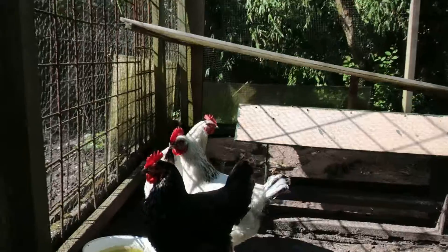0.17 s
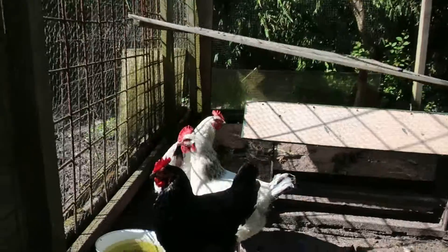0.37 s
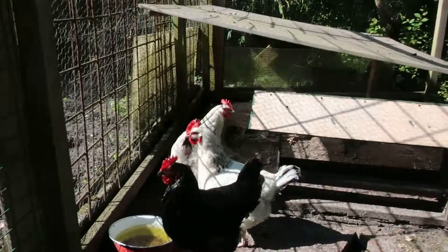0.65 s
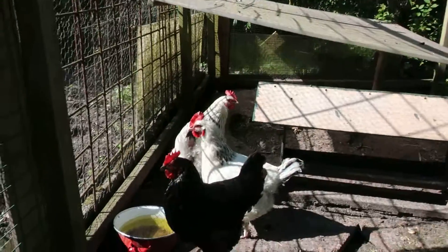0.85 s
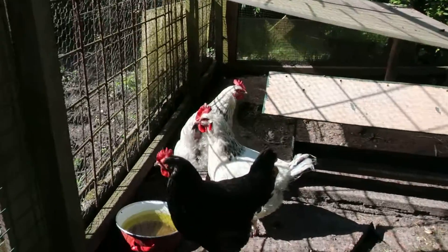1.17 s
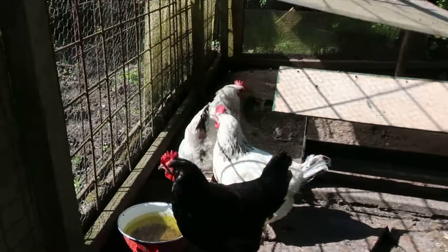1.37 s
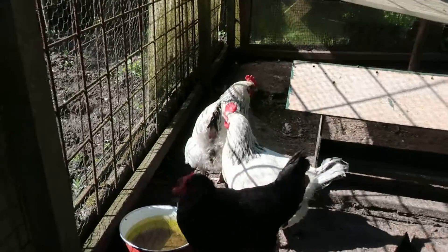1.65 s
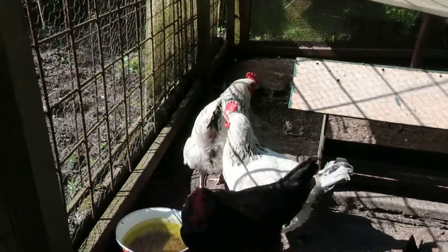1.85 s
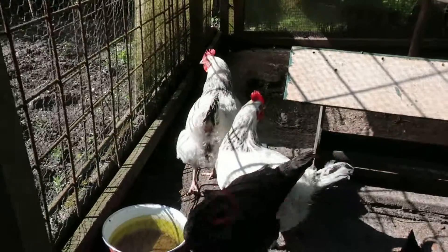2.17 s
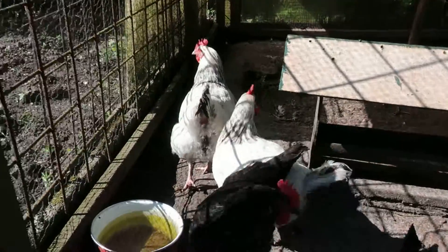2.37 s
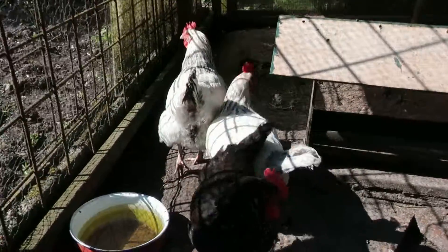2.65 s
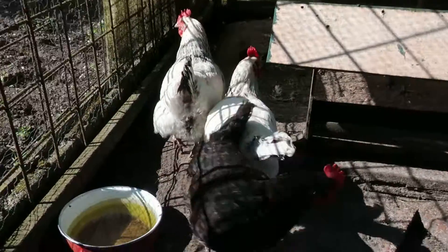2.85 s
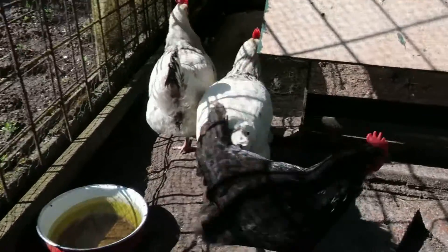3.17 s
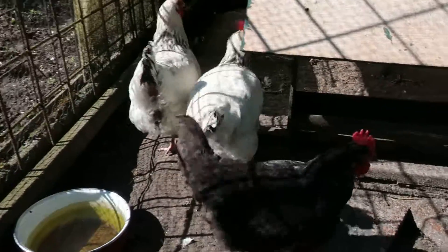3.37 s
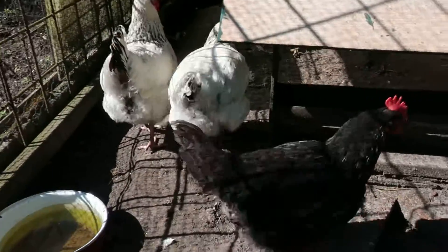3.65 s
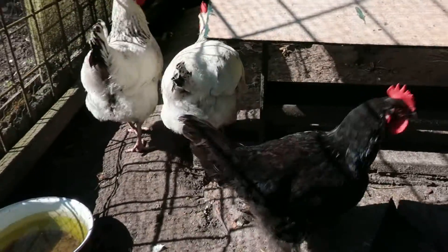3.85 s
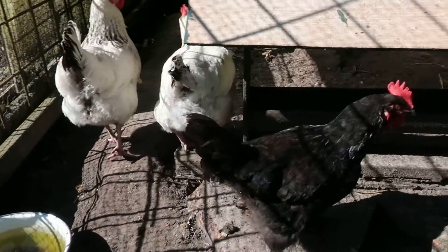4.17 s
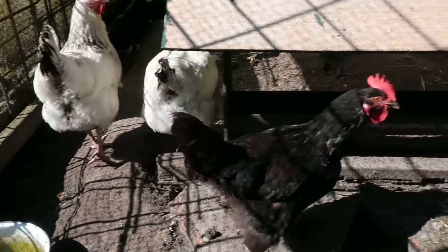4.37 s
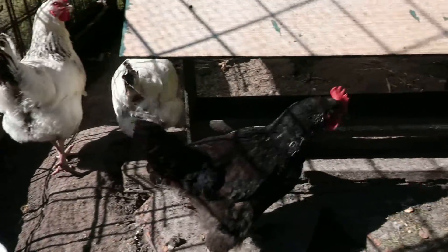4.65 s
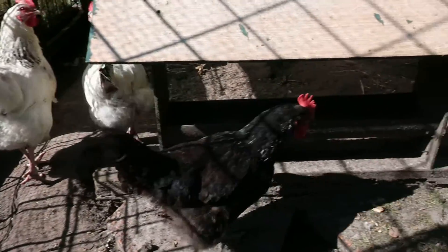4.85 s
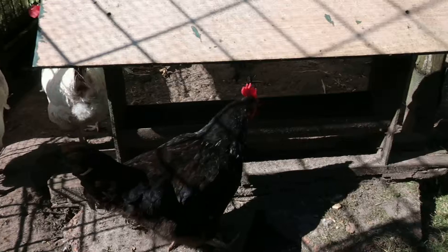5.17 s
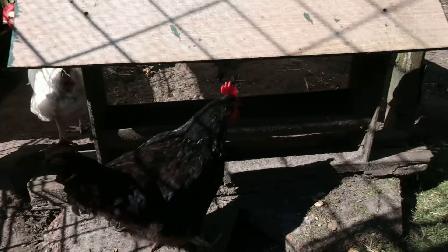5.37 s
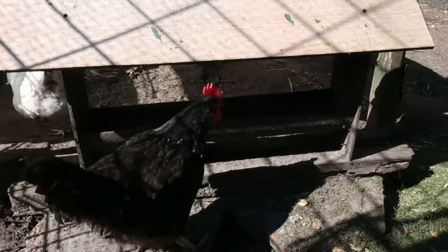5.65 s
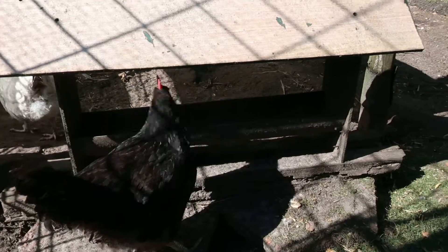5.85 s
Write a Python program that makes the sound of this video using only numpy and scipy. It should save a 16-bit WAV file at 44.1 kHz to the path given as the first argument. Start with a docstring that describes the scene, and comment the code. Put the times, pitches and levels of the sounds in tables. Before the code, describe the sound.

An outdoor hen run, close stereo microphone, with low wind and far traffic rumbling softly throughout. The first 0.9 seconds are nearly empty, just faint taps. From 0.9 to 1.7 s a soft, steady whine around 600 Hz mixes with short low clucks and small taps. A gust bumps near 2.35 s. At 2.5-2.8 s firmer clucks bunch together, then a sharp woody tap at 2.84 s as a clearer whine holds to 3.1 s, breaking into quick flutters and clucks until 3.4 s. Last clucks at 3.6 s, with a dull foot drag at 3.7 s. Songbirds, trilling from about 2.8 s, stand out at 3.5-4.6 s with echoing whistles. A whine rises and falls at 4.8-5.2 s; another quavers rapidly from 5.2 s, growing brighter and loudest at 5.64 s. A brief whine follows at 5.9 s with faint birds.

```python
"""Hens in a wire run: drawn-out whines, nearly pure tones whose pitch flips and flutters, overtones shaped by the beak.
Between them short clucks, harmonic voices through throat and mouth resonances; damped rings for beak and claw taps.
Feet scuff the dirt in bursts of gritty noise. Songbirds whistle and trill from the trees beyond, with echoes.
Far traffic and a light wind rumble as banded noise under a close pair of microphone ports.
Faint hums at fixed pitch swell and fade."""
import sys
import numpy as np
from scipy import signal
from scipy.io import wavfile
from scipy.ndimage import map_coordinates

SR = 44100
rng = np.random.default_rng(int(sys.argv[2]) if len(sys.argv) > 2 else 0)


def wav_record(signal):
    """Record a signal, one row per channel, as 16-bit PCM in the file named by sys.argv[1]."""
    frames = np.transpose(np.atleast_2d(signal))
    bounded = np.clip(frames, -1, 1)
    # unit amplitude maps onto the largest positive 16-bit level
    quanta = np.round(bounded * 32767).astype(np.int16)
    wavfile.write(sys.argv[1], SR, quanta)


N = 265041
TIME_S = np.arange(N) / SR

# far traffic and leaves, spectrum: hz, density_db_per_hz
AIR_SPECTRUM = [(18, -15.5), (40, 0), (100, 1), (200, -9), (400, -16), (800, -17.5), (1600, -24.5),
                (3200, -32.5), (6300, -40), (8500, -42.5), (10500, -49.5), (13500, -47.5), (15500, -56)]
AIR_DB = -39
# wind on the ports: time_s, level_db
WIND_GUSTS = [(0.0, -39), (.15, -46), (.32, -33), (.4, -40.5), (1.04, -44.5), (1.28, -41), (2.33, -43),
              (2.35, -29), (2.4, -33), (2.61, -43.5), (3.67, -38.5), (3.92, -44.5), (4.35, -40),
              (4.45, -47), (4.54, -35.5), (5.04, -44.5), (5.36, -44.5), (5.47, -39), (6.01, -43)]
# faint hums at fixed pitch, swelling and fading: pitch_hz, waver_points_per_s, level_db
HUM_TONES = [(98.4, 5.4, -52), (133, 5, -49.5), (790, 29, -59.5), (6680, 8, -82)]
# left-right likeness; the ports turn the treble out of step: hz, likeness (-1 to 1)
EAR_LIKENESS = [(60, 1), (150, 1), (380, .66), (940, 0.69), (2360, 0.2), (5920, -0.56), (9000, -0.71),
                (14800, -0.95)]

# songbird whistles: start_s, end_s, first_hz, last_hz, level_db
BIRD_WHISTLES = [(0, .056, 1835, 1794, -54), (1.52, 1.599, 1482, 1707, -53), (1.86, 1.93, 1420, 1620, -54),
                 (1.943, 2.035, 1620, 1740, -55), (2.04, 2.17, 1798, 1784, -57),
                 (1.84, 1.948, 1850, 1897, -62.5), (1.9, 2.015, 2510, 2490, -61),
                 (2.202, 2.292, 1880, 1996, -61.5), (2.12, 2.24, 1200, 1077, -55),
                 (3.49, 3.578, 3063, 2965, -45), (3.555, 3.599, 3000, 2822, -40.5),
                 (3.59, 3.608, 2865, 2670, -47), (3.534, 3.66, 1980, 1910, -52),
                 (3.93, 3.975, 1290, 1520, -50), (3.964, 4.02, 1488, 1850, -49),
                 (4.111, 4.186, 2035, 2480, -40), (4.17, 4.24, 1820, 1765, -51),
                 (4.21, 4.375, 1779, 1640, -45.5), (4.228, 4.308, 3530, 3350, -63),
                 (4.31, 4.361, 2137, 2480, -39.5), (4.35, 4.41, 3360, 3300, -67),
                 (4.425, 4.445, 2900, 2880, -58), (4.425, 4.456, 4050, 4220, -65),
                 (4.45, 4.469, 4220, 3750, -59.5), (4.465, 4.482, 3840, 3950, -62.5),
                 (4.475, 4.487, 3950, 2800, -53), (4.535, 4.56, 4200, 4350, -66.5),
                 (4.557, 4.576, 4050, 3750, -60), (4.573, 4.59, 3830, 3900, -62),
                 (4.585, 4.598, 3910, 2800, -54), (4.892, 4.995, 2702, 2654, -53),
                 (5.02, 5.3, 2750, 2484, -66.5), (5.868, 5.95, 1620, 1720, -56),
                 (5.945, 5.998, 1750, 1715, -49.5), (5.94, 6.01, 1190, 1140, -56.5)]
# songbird trills: start_s, end_s, first_hz, last_hz, level_db, trill_depth_hz
BIRD_TRILLS = [(2.812, 3.287, 2202, 2250, -47.5, 289), (3.166, 3.275, 3350, 3400, -60, 80),
               (3.455, 3.52, 3084, 3060, -54, 90), (3.854, 3.975, 2402, 1900, -50.5, 60),
               (3.96, 4.086, 1858, 1952, -45, 80), (4.18, 4.32, 2280, 2127, -45.5, 280),
               (4.34, 4.593, 2680, 2610, -52, 45), (4.37, 4.519, 2280, 2400, -56.5, 150),
               (4.451, 4.629, 1700, 1882, -54.5, 80), (4.8, 5.096, 1865, 1674, -57, 150),
               (5.7, 5.849, 1900, 2320, -58.5, 120), (5.78, 5.869, 1500, 1610, -49.5, 130)]
TRILL_PER_S, TRILL_RETURN = 33.7, .36  # return: share of each cycle spent climbing
TRILL_WIDENS, TRILL_PULSE, TRILL_BURR = .45, .35, .16  # shares: depth gained, level pulse, pitch burr
LINGER = .64  # halfway through, a glide stands this share of its range above its low end
SONG_FLUTTER, SONG_WAVER_HZ = .25, 18  # flutter: share of level
TREES_T60_S, TREES_DB, TREES_WIDTH = .4, -5.5, .45
WALL_DELAY_S, WALL_T60_S, WALL_DB = .09, .25, -12  # a far wall throws the song back late

# feet scuffing the dirt: start_s, length_s, level_db
FOOT_SCUFFS = [(1.38, .12, -65), (2.294, .028, -71), (2.54, .017, -41.5), (2.61, .058, -65.5),
               (2.7656, 0.016, -45.5), (2.878, 0.057, -51), (3.026, .034, -55.5), (3.362, .015, -50),
               (3.5514, .021, -55.5), (3.74, .043, -56), (3.898, .026, -46), (3.955, .056, -48.5),
               (4.805, .032, -58), (4.97, 0.043, -63), (5.113, .017, -62)]
# one heavy dull drag: start_s, length_s, level_db, brightness_db
HEAVY_DRAG = (3.683, 0.0667, -39.5, -21)
# scuff spectrum: hz, density_db_per_hz
DIRT_SPECTRUM = [(200, -3.5), (1500, 2.5), (3000, -0.5), (5000, -13.5), (8000, -27), (13000, -19.5)]
FIRM_SCUFF_DB, FIRM_BRIGHT_DB, BRIGHT_DB_PER_DB_LIGHTER = -45, 3.5, .62

# beak and claw taps, and one click at the start of a cluck (3.114 s): time_s, peak_db (before the contact
# filter), ring_hz
BEAK_CLAW_TAPS = [(0.0592, -39, 1760), (.4777, -42, 1770), (1.3373, -36, 1420), (1.7348, -32, 1990),
                  (1.789, -45, 2680), (2.7683, -29, 1210), (2.8436, -12, 1826), (3.114, -40, 2650)]
TAP_CONTACT_HZ, TAP_T60_S, FAINT_RING_S_PER_DB = 3000, .0062, .0005  # fainter taps ring longer

# clucks: start_s, end_s, first_hz, last_hz, level_db, throat_hz, roughness (0-1), growl (0-1)
HEN_CLUCKS = [(0.885, 0.945, 349.6, 314.6, -32, 643, 0.05, 0),
              (1.209, 1.271, 354.3, 375, -25, 765, 0.02, 0.2),
              (1.272, 1.351, 359, 346.3, -26.5, 707, 0.08, 0.07),
              (1.376, 1.463, 353, 356, -32.5, 650, 0.14, 0.18),
              (1.501, 1.563, 341, 355, -41, 710, 0.09, .05), (1.542, 1.613, 281.4, 269, -40, 590, 0.19, 0),
              (1.599, 1.632, 417, 426, -35, 606, 0.23, 0.1),
              (1.605, 1.714, 287.2, 269.6, -45.5, 300, 0.01, .05),
              (1.628, 1.678, 272, 277, -32.5, 543, 0.19, 0.2),
              (1.66, 1.705, 389, 394, -24, 805, 0.02, 0.03), (1.698, 1.74, 389, 368, -43, 780, 0.29, 0),
              (2.078, 2.131, 500, 517, -30, 500, 0.08, 0.53),
              (2.091, 2.131, 445, 448, -31.5, 936, 0.16, 0.78),
              (2.477, 2.507, 275, 330, -30.5, 707, 0.22, 0.03),
              (2.494, 2.522, 385.4, 383, -20.5, 820, 0.13, 0.01),
              (2.515, 2.553, 330, 315, -39.5, 704, 0.2, 0), (2.649, 2.692, 394, 398, -17, 790, 0.05, 0),
              (2.682, 2.735, 261.6, 265.4, -30, 746, 0.3, 0.3),
              (2.722, 2.755, 398, 403.4, -18, 790, 0.06, 0.2),
              (2.679, 2.865, 275.8, 278, -46.5, 282, 0, 0.1),
              (2.748, 2.813, 415, 389.5, -26, 775, 0.15, 0.4),
              (3.106, 3.144, 335.5, 338, -27, 754, 0.18, 0),
              (3.15, 3.226, 335.2, 358.6, -29.5, 788, 0.11, 0.33),
              (3.264, 3.328, 345, 352, -29, 777, 0.11, 0.14), (3.599, 3.638, 302, 304, -33.5, 830, .15, 0),
              (3.628, 3.689, 348, 338, -30.5, 800, 0.19, 0.05)]
THROAT_WIDTH_HZ, CHEST_DB, GROWL_HZ = 227, -21, 75.7
# mouth resonance at full cry: hz, gain_db
MOUTH_GAIN = [(1000, -37.5), (1500, -30.5), (2100, -55), (3000, -69)]
FULL_CRY_DB, MOUTH_DB_PER_DB = -14.5, .54  # a softer cluck opens the mouth less
# beak wide open, resonance: hz, gain_db
RASP_GAIN = [(2300, -27.5), (2800, 1), (3300, -7), (4000, -9.5), (4600, -21.5)]
# beak wide open, times: start_s, end_s, gain_db
RASP_TIMES = [(2.73, 2.752, -37.5), (2.78, 2.805, -33.5)]

# drawn-out whines, one list of points a call: time_s, pitch_hz, level_db
HEN_WHINES = [
    [(.94, 618, -44), (.99, 592, -43.5), (1.08, 610, -33.5), (1.2, 620, -32.5), (1.3, 620, -33),
     (1.37, 650, -29), (1.465, 597.5, -30), (1.478, 593, -43.5), (1.49, 605, -32.5), (1.52, 540, -47)],
    [(2.695, 790, -43.5), (2.735, 734.7, -26.5), (2.79, 717.5, -21.5), (2.86, 750, -24), (2.95, 720, -21.5),
     (2.985, 734, -23.5), (3.0, 754, -34.5), (3.08, 790, -35), (3.105, 846, -40)],
    [(3.12, 953, -33.5), (3.146, 792, -29.5), (3.165, 810, -36), (3.178, 881, -34.5), (3.206, 840, -27.5),
     (3.229, 964, -37.5), (3.243, 864, -27.5), (3.258, 868, -28), (3.27, 890, -38), (3.284, 869, -28),
     (3.304, 836, -29.5), (3.324, 918, -36), (3.333, 948, -41.5), (3.36, 865, -46)],
    [(3.32, 1280, -50), (3.328, 1300, -44), (3.337, 1350, -61), (3.348, 1365, -37.5), (3.36, 1330, -55)],
    [(4.812, 608, -41.5), (4.85, 629, -31.5), (4.93, 735, -23), (4.99, 822, -21), (5.045, 788, -21.5),
     (5.08, 651, -31), (5.13, 632, -32.5), (5.165, 562, -36), (5.18, 570, -47)],
    [(5.182, 590, -34.5), (5.19, 671, -29.5), (5.27, 664.5, -28), (5.41, 726, -21.5), (5.45, 731, -21),
     (5.505, 704, -25), (5.542, 621, -26.5), (5.565, 680, -23.5), (5.59, 752, -19.5), (5.636, 775, -15.5),
     (5.652, 750, -32)],
    [(5.865, 708, -50), (5.871, 723, -29), (5.89, 651, -30), (5.93, 691, -28), (5.942, 680, -41)],
]
# voice flips, runs of them make a flutter: time_s, jump_hz, swell_db (negative dips)
VOICE_FLIPS = [(2.875, 80, -14), (3.005, 119, -4.5), (3.03, -0.5, 9.5), (3.05, 60, -7), (3.066, 142, 0),
               (4.858, 130, 4.5), (4.888, 249.5, 2), (4.919, 289, -5.5), (5.014, 80, -5.5),
               (5.216, 50, 2.5), (5.242, 90, 5.5), (5.272, 110, 6), (5.302, 215, 5), (5.33, 275, 4),
               (5.363, 284.5, 3), (5.39, 290, 2), (5.424, 200.5, -2), (5.455, 40, 1), (5.484, 50, 2.5),
               (5.512, 45, 4), (5.535, 39.5, 2.5), (5.56, 44.5, 2.5), (5.59, 45, 2), (5.908, 162, -2.5)]
# stretches where the whine rattles: start_s, end_s, pitch_shake_hz, level_shake_db
WHINE_RATTLES = [(1.2, 1.5, 18, 2), (2.69, 2.8, 12, 2), (3.04, 3.11, 25, 2), (3.12, 3.23, 30, 4),
                 (3.27, 3.36, 35, 4), (4.86, 4.93, 25, 2), (5.29, 5.435, 20, 1.2)]
# throat resonance a flip sweeps the tone across: hz, gain_db
WHINE_THROAT_GAIN = [(600, -7), (720, -3), (820, 0.5), (900, -0.5), (1000, -5.5)]
# whine overtones leaving by the open beak: hz, gain_db
BEAK_GAIN = [(1100, -11.5), (1320, -3), (1540, 0.5), (1620, -8.5), (1700, -25.5), (2000, -28), (2300, -29),
             (3000, -30), (3600, -20), (4000, -33.5), (4800, -45.5)]
# overtone level at the start of each whine and after .22 s: first_overtones_db, later_overtones_db
OVERTONE_LEVELS = [(-37, -38), (-32.5, -36.5), (-25, -27), (-40, -40), (-36, -26.5), (-26.5, -11),
                   (-15.5, -9)]
OVERTONE_SHIFT_S, FLIP_S = .22, .023
WHINE_WAVER_HZ, WHINE_WAVER_DB = 12, .7
FLIP_MUFFLES_DB_PER_HZ = -.0502  # overtones drop while the pitch is raised

HENS_LEFT_OVER_RIGHT_DB, HENS_LEFT_LEAD_S = -1.1, 1.2e-5
COOP_DB, COOP_T60_S, COOP_WIDTH = -21, .07, .25
CUTOFF_HZ = 16000


def from_db(db):
    """Amplitude gain of a level."""
    return 10 ** (np.asarray(db) / 20)


def rms_one(x):
    """Scale to unit power."""
    return x / np.sqrt(np.mean(x ** 2) + 1e-20)


def at_hz(points, hz):
    """Read a curve on a log frequency axis."""
    curve_hz, values = np.array(points).T
    return np.interp(np.log(hz), np.log(curve_hz), values)


def drift(points_per_s):
    """Random points joined smoothly, rms 1; at most 400 a second."""
    points = rng.standard_normal(2500)
    return rms_one(map_coordinates(points, [TIME_S * min(points_per_s, 400) + 2], order=3))


def note(start_s, end_s, attack_s, release_s):
    """Samples of a note, progress 0-1 through it, and its rounded envelope."""
    span = slice(int(start_s * SR), int(end_s * SR))
    t = TIME_S[span]
    edge = np.clip(np.minimum((t - start_s) / attack_s, (end_s - t) / release_s), 0, 1)
    return span, (t - start_s) / (end_s - start_s), np.sin(np.pi / 2 * edge) ** 2


def stereo_noise(spectrum, patchy_db, near):
    """0.4-octave noise bands, each with its own level, flicker and likeness (raised by near); rms 1."""
    out, edges_hz = 0, 18 * 2 ** np.arange(0, 10, .4)
    white = rng.standard_normal((2, 2, N))
    for k, (low_hz, high_hz) in enumerate(zip(edges_hz, edges_hz[1:])):
        band = signal.butter(2, [low_hz, high_hz], "band", fs=SR, output="sos")
        mid, side = signal.sosfilt(band, white[k % 2])
        hz = np.sqrt(low_hz * high_hz)
        alike = np.clip(at_hz(EAR_LIKENESS, hz) + near, -.99, .993)
        gain = from_db(at_hz(spectrum, hz) + patchy_db * drift(6))
        out = out + gain * (np.sqrt(1 + alike) * mid + np.sqrt(1 - alike) * side * [[1], [-1]])
    return rms_one(out)


def echoes(x, t60_s, width):
    """Scattered returns dying away; width scales the part opposite in the two ears."""
    t = TIME_S[:int(.8 * SR)]
    decay = from_db(-60 * t / t60_s) * (t > .004)
    mid, side = rng.standard_normal((2, len(t))) * decay
    tail = (mid + width * side * [[1], [-1]]) / np.sqrt(np.sum(mid ** 2))
    return signal.fftconvolve(x[None], tail, axes=1)[:, :N]


def background():
    """Broad hiss, a rumble that follows the gusts, and hums that swell and fade."""
    air = stereo_noise(AIR_SPECTRUM, patchy_db=1.1, near=0)
    low = signal.sosfilt(signal.butter(2, 230, fs=SR, output="sos"), air)
    gust_db = np.interp(TIME_S, *np.transpose(WIND_GUSTS))
    out = from_db(AIR_DB) * (air - low) + from_db(gust_db) * rms_one(low)
    for hz, waver_points_per_s, level_db in HUM_TONES:
        tone = np.sin(2 * np.pi * hz * TIME_S)
        out = out + from_db(level_db) * drift(waver_points_per_s) * tone
    return out


def songbirds():
    """Whistled glides, curved in pitch; a trill swings the pitch quickly and pulses twice a cycle."""
    out, unsteady_turns, burr = np.zeros(N), .08 * drift(50), drift(300)
    flutter, waver_hz = 1 + SONG_FLUTTER * drift(240), SONG_WAVER_HZ * drift(150)
    rows = [(*row, 0) for row in BIRD_WHISTLES] + BIRD_TRILLS
    for start_s, end_s, first_hz, last_hz, level_db, trill_hz in rows:
        length_s = end_s - start_s
        span, along, envelope = note(start_s, end_s, min(.3 * length_s, .05), .15 * length_s)
        turns = TRILL_PER_S * (TIME_S[span] - start_s) + unsteady_turns[span]
        swing = signal.sawtooth(2 * np.pi * turns, TRILL_RETURN)
        swing = swing * (1 + TRILL_WIDENS * (along - .5)) + TRILL_BURR * burr[span]
        pulse = 1 - TRILL_PULSE * (trill_hz > 0) * np.cos(4 * np.pi * turns)
        middle_hz = min(first_hz, last_hz) + LINGER * abs(last_hz - first_hz)
        bend_hz = 2 * middle_hz - (first_hz + last_hz) / 2  # curve passes through middle_hz
        glide_hz = first_hz * (1 - along) ** 2 + 2 * bend_hz * along * (1 - along) + last_hz * along ** 2
        hz = glide_hz + trill_hz * swing + waver_hz[span]
        tone = np.sin(2 * np.pi * np.cumsum(hz) / SR)
        out[span] += np.sqrt(2) * from_db(level_db) * envelope * pulse * tone
    return out * flutter


def scuffs():
    """Gritty noise bursts; brightness sets the part above 4500 Hz, more for lighter scuffs."""
    grit = stereo_noise(DIRT_SPECTRUM, patchy_db=1, near=.7) * from_db(2.5 * drift(400))
    treble = signal.sosfilt(signal.butter(2, 4500, "high", fs=SR, output="sos"), grit)
    out, rows = np.zeros((2, N)), []
    for start_s, length_s, level_db in FOOT_SCUFFS:
        bright_db = FIRM_BRIGHT_DB + BRIGHT_DB_PER_DB_LIGHTER * (FIRM_SCUFF_DB - level_db)
        rows.append((start_s, length_s, level_db, bright_db))
    for start_s, length_s, level_db, bright_db in rows + [HEAVY_DRAG]:
        span, _, envelope = note(start_s, start_s + length_s, .35 * length_s, .5 * length_s)
        burst = grit[:, span] + (from_db(bright_db) - 1) * treble[:, span]
        out[:, span] += from_db(level_db) * envelope * burst
    return out


def taps():
    """Short damped rings, low-passed by a soft contact."""
    out = np.zeros(N)
    loudest_db = max(db for _, db, _ in BEAK_CLAW_TAPS)
    for start_s, peak_db, ring_hz in BEAK_CLAW_TAPS:
        t60_s = TAP_T60_S + FAINT_RING_S_PER_DB * (loudest_db - peak_db)
        t = np.clip(TIME_S - start_s, 0, None)
        out -= from_db(peak_db - 60 * t / t60_s) * np.sin(2 * np.pi * ring_hz * t)
    return signal.sosfilt(signal.butter(7, TAP_CONTACT_HZ, fs=SR, output="sos"), out)


def clucks():
    """Harmonics through a narrow throat and a broad mouth resonance; growl chops them into throbs."""
    out, waver, breath = np.zeros(N), drift(150), drift(300)
    gape = np.zeros(N)
    for start_s, end_s, rasp_db in RASP_TIMES:
        span, _, envelope = note(start_s, end_s, .0089, .008)
        gape[span] = from_db(rasp_db) * envelope
    for start_s, end_s, first_hz, last_hz, level_db, throat_hz, rough, growl in HEN_CLUCKS:
        span, along, envelope = note(start_s, end_s, .0064, .012)
        hz = (first_hz + (last_hz - first_hz) * along) * (1 + .26 * rough * waver[span])
        phase, voice = 2 * np.pi * np.cumsum(hz) / SR, 0
        mouth_db = MOUTH_DB_PER_DB * (level_db - FULL_CRY_DB)
        for k in range(1, 12):
            throat = 1 / (1 + ((k * hz - throat_hz) / THROAT_WIDTH_HZ) ** 2) ** 1.8
            mouth = from_db(at_hz(MOUTH_GAIN, k * hz) + mouth_db)
            rasp = gape[span] * from_db(at_hz(RASP_GAIN, k * hz))
            chest = from_db(CHEST_DB) * (k == 1)
            voice = voice + (throat + mouth + rasp + chest) * np.cos(k * phase + k)
        throb_s = TIME_S[span] - start_s - .019
        throb = 1 + np.clip(growl, 0, 1) * np.cos(2 * np.pi * GROWL_HZ * throb_s)
        out[span] += from_db(level_db) * envelope * throb * (1 + rough * breath[span]) * rms_one(voice)
    return out


def whines():
    """A nearly pure tone; flips jump its pitch and change its level, overtones pass the beak."""
    rise_hz, swell_db = WHINE_WAVER_HZ * drift(70), WHINE_WAVER_DB * drift(90)
    pitch_shake, level_shake = drift(260), drift(260)
    for start_s, end_s, shake_hz, shake_db in WHINE_RATTLES:
        span, _, envelope = note(start_s, end_s, .01, .01)
        rise_hz[span] += shake_hz * envelope * pitch_shake[span]
        swell_db[span] += shake_db * envelope * level_shake[span]
    for flip_s, jump_hz, gain_db in VOICE_FLIPS:
        bump = np.cos(np.pi * np.clip((TIME_S - flip_s) / FLIP_S, -.5, .5)) ** 1.4
        rise_hz, swell_db = rise_hz + jump_hz * bump, swell_db + gain_db * bump
    # phase blur in radians: each overtone is hoarser than the one below
    blur = {k: (.25 + .28 * (k - 2)) * drift(250) for k in range(2, 7)}
    out = np.zeros(N)
    for call, overtone_points_db in zip(HEN_WHINES, OVERTONE_LEVELS):
        s, pitch_hz, level_db = np.transpose(call)
        span, _, envelope = note(s[0], s[-1], .0019, .0029)
        t = TIME_S[span]
        held_hz = np.interp(t, s, pitch_hz)
        hz = held_hz + rise_hz[span]
        phase = 2 * np.pi * np.cumsum(hz) / SR
        throat_db = at_hz(WHINE_THROAT_GAIN, hz) - at_hz(WHINE_THROAT_GAIN, held_hz)
        fundamental = from_db(throat_db) * np.cos(phase)
        overtones = 0
        for k in range(2, 7):
            overtones = overtones + from_db(at_hz(BEAK_GAIN, k * hz)) * np.cos(k * phase + blur[k][span])
        overtone_db = np.interp(t - s[0], [0, OVERTONE_SHIFT_S], overtone_points_db)
        overtone_db = overtone_db + FLIP_MUFFLES_DB_PER_HZ * np.maximum(rise_hz[span], 0)
        voice = fundamental + from_db(overtone_db) * overtones
        gain = from_db(np.interp(t, s, level_db) + swell_db[span])
        out[span] += np.sqrt(2) * envelope * gain * voice
    return out


def scene():
    """Hens close in front, wood of the coop beside them, birds deep in the trees."""
    birds = songbirds()
    far = birds + from_db(TREES_DB) * echoes(birds, TREES_T60_S, TREES_WIDTH)
    late_birds = np.interp(TIME_S - WALL_DELAY_S, TIME_S, birds, left=0)
    far = far + from_db(WALL_DB) * echoes(late_birds, WALL_T60_S, TREES_WIDTH)
    hens = taps() + clucks() + whines()
    late_hens = np.interp(TIME_S - HENS_LEFT_LEAD_S, TIME_S, hens)
    left = hens * from_db(HENS_LEFT_OVER_RIGHT_DB / 2)
    right = late_hens * from_db(-HENS_LEFT_OVER_RIGHT_DB / 2)
    near = np.array([left, right]) + from_db(COOP_DB) * echoes(hens, COOP_T60_S, COOP_WIDTH)
    return background() + far + scuffs() + near


def record(dry):
    """A steep low-pass removes the top."""
    return signal.sosfilt(signal.cheby2(12, 70, CUTOFF_HZ, fs=SR, output="sos"), dry)


dry = scene()
out = record(dry)
wav_record(out)
```